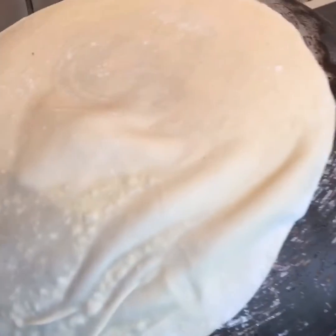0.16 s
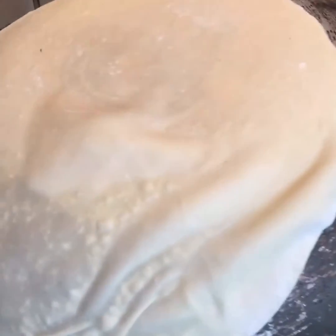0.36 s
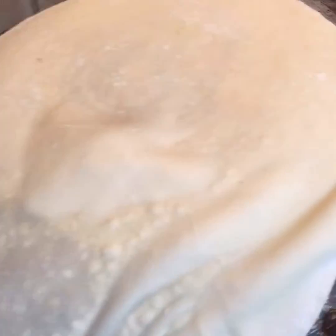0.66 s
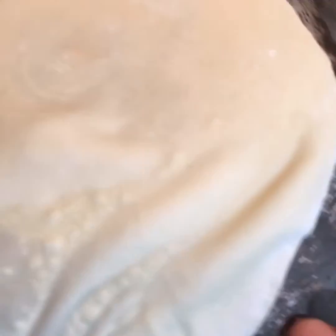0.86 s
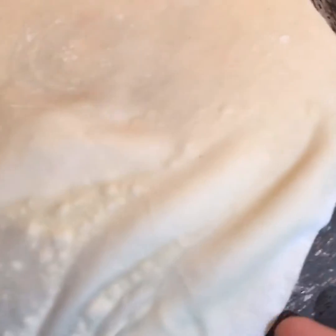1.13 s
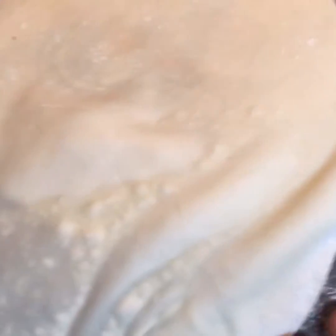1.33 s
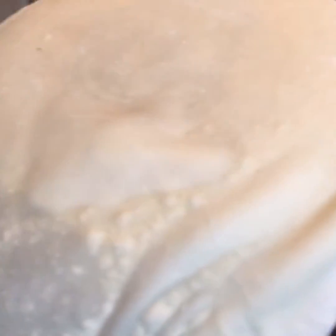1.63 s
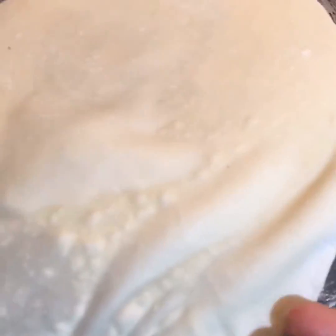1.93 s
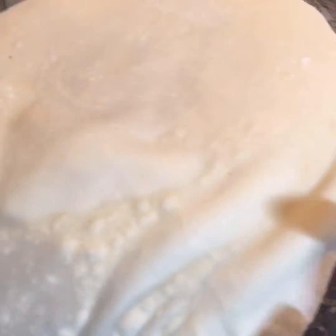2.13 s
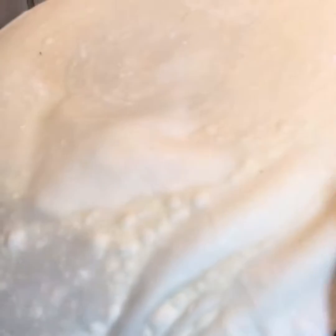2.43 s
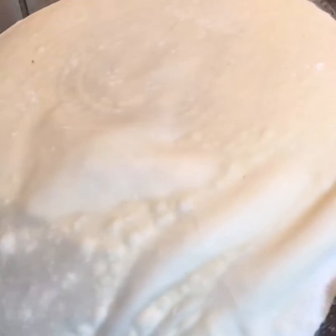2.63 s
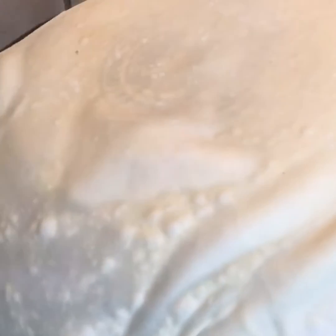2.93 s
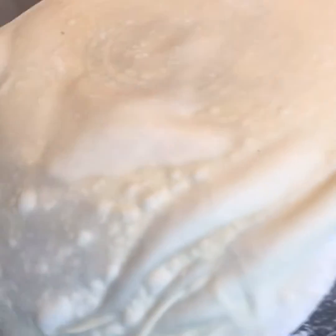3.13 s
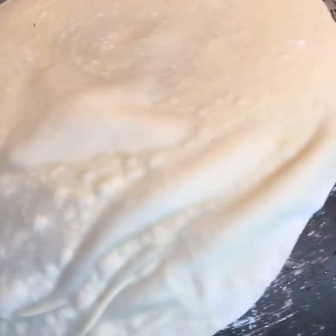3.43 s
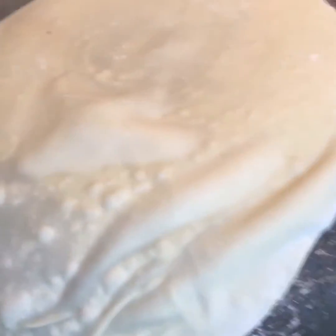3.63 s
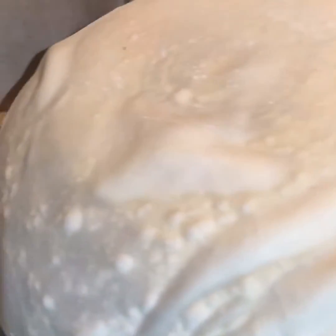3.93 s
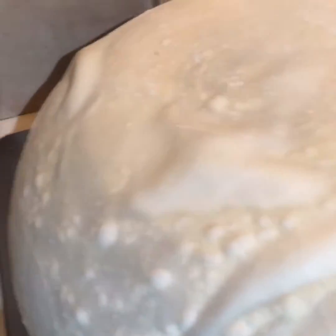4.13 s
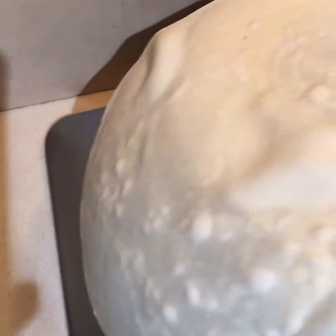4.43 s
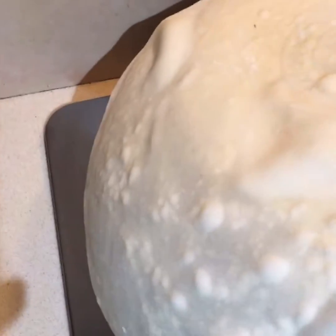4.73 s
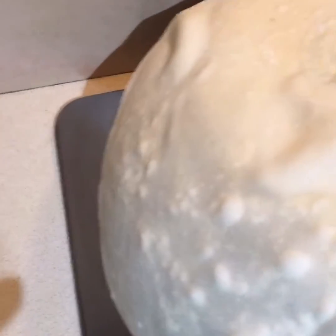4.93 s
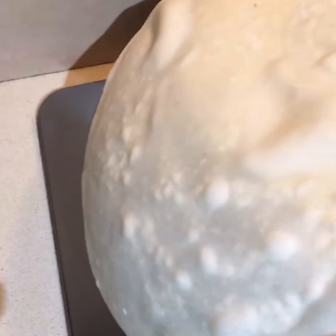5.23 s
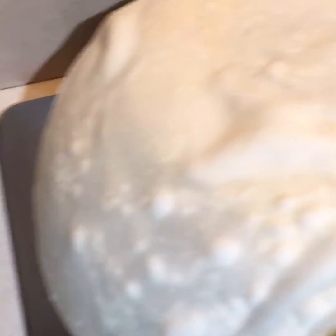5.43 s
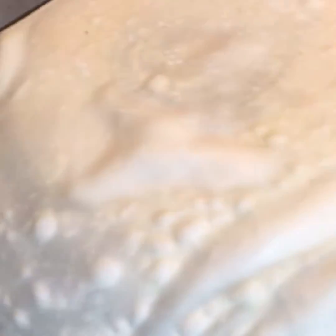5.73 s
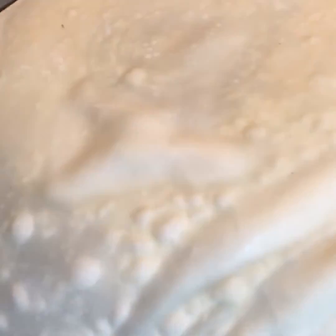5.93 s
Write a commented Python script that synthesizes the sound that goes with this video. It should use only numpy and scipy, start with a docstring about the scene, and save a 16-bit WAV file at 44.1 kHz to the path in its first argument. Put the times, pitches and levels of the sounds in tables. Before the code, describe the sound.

A gas flame burns with a low rumble and a steady hiss under a pan of flatbread, heard from close by in a kitchen. Right at the start come a light tap and the sharp, bouncing clatter of a wooden tool on the worktop. After that, small pops tick irregularly from the dough over a faint sizzle, and the burner grows a little softer as the microphone turns away.

```python
"""A light tap on a worktop over a burner's rumble and hiss, then a wooden tool set down and dropped
with a bounce. Hard-walled kitchen, phone microphone close to a flatbread on an upturned pan.
The turbulent flame rumbles, the gas jet hisses through the burner tube, and blisters in the dough
tick as they burst; one squeaks. Past halfway the microphone turns away and the burner softens."""
import sys
import numpy as np
from scipy import signal
from scipy.fft import rfft, irfft
from scipy.io import wavfile
from scipy.ndimage import uniform_filter1d

SR = 44100
rng = np.random.default_rng(int(sys.argv[2]) if len(sys.argv) > 2 else 0)


def to_wav(sig):
    """Store sig (one row per channel, or 1-D mono) as 16-bit WAV at the path in sys.argv[1].

    Samples outside -1..1 are clipped; the rate is SR.
    """
    pcm = np.clip(np.atleast_2d(sig), -1, 1) * 32767
    pcm = np.round(pcm).astype(np.int16)
    wavfile.write(sys.argv[1], SR, pcm.T)  # frames by channels


N = 267985
T = np.arange(N) / SR


def undb(db):
    return 10 ** (np.asarray(db) / 20)


def level(x, db):
    """Scale to an rms level."""
    return x * undb(db) / np.sqrt(np.mean(x ** 2))


def curve(rows):
    """Gain gliding through (t/s, level/dB) points."""
    return undb(np.interp(T, *np.transpose(rows)))


def mic_turn(facing_db, away_db, start_s=3.55, length_s=0.28):
    """Gain of a layer as the microphone turns away from the burner."""
    return curve([(start_s, facing_db), (start_s + length_s, away_db)])


def band(x, hz, width_hz):
    """Two-pole resonance, gain 1 at the centre."""
    return signal.lfilter(*signal.iirpeak(hz, hz / width_hz, fs=SR), x)


def flicker(depth_db, rate_hz):
    """Smoothly wandering gain with a spread of depth_db."""
    hold = int(SR / rate_hz)
    steps = np.repeat(rng.standard_normal(N // hold + 1), hold)
    drift = uniform_filter1d(uniform_filter1d(steps, hold), hold)[:N]
    return undb(depth_db * drift / drift.std())


def coloured(spectrum):
    """Steady noise with the given spectrum, rms 1."""
    hz, db = np.transpose(spectrum)
    bins_hz = np.maximum(np.arange(N // 2 + 1) * SR / N, 1)
    gain = undb(np.interp(np.log(bins_hz), np.log(hz), db))
    return level(irfft(rfft(rng.standard_normal(N)) * gain, N), 0)


def resonant(modes, flicker_db, rate_hz):
    """Noise singing in each resonance, every one wavering alone."""
    out = 0
    for hz, width, db in modes:
        tone = band(band(rng.standard_normal(N), hz, width), hz, 2 * width)
        out += level(tone, db) * flicker(flicker_db, rate_hz)
    return out


# The flame's roar at close range: f/Hz, relative level/dB
ROAR_SPECTRUM = [(88, -39), (150, -4), (204, 1), (261, -12), (504, -9.5), (1030, -19.5), (1230, -15.5),
                 (1580, -31), (2500, -30), (3250, -100), (5500, -120)]
# Air resonances of the kitchen and under the pan: f/Hz, width/Hz, relative level/dB
KITCHEN_MODES = [(45.6, 24, -6), (74.8, 17, -1), (115.6, 24, -1), (119.6, 30, -9), (187, 14.2, -3),
                 (210.5, 7.6, -3), (235.5, 18, -21.5)]
PAN_MODES = [(291, 54, 0), (489, 88, -3), (709, 134, -6), (1188.3, 39, -4), (1267, 82, -2.5)]
# Rumble at the microphone: t/s, level/dB
RUMBLE_LEVELS = [(1.0, -47.5), (1.13, -48.5), (2.67, -48), (2.8, -50.5), (3.69, -47), (3.87, -50.5),
                 (5.31, -51), (5.6, -55), (6.08, -49.5)]

def flame():
    """Turbulent burning drives a rumble in the kitchen air and a fluttering roar under the pan."""
    roar = coloured(ROAR_SPECTRUM) * flicker(depth_db=1, rate_hz=9)
    roar += undb(-5.5) * resonant(PAN_MODES, flicker_db=2.8, rate_hz=5.99)
    rumble = resonant(KITCHEN_MODES, flicker_db=0.85, rate_hz=3.99)
    return level(rumble, 0) * curve(RUMBLE_LEVELS) + level(roar, 3.66) * mic_turn(-57, -59.5)


# The jet's hiss at close range: f/Hz, relative level/dB
HISS_SPECTRUM = [(880, -18), (1500, -3), (2480, -8.5), (3140, -0.5), (4050, -7.5), (5610, -9.5),
                 (7600, -10.5), (9000, -7.5), (12300, -14), (13500, -12), (15800, -14.5)]
# Burner tube resonances: f/Hz, width/Hz, relative level/dB
TUBE_MODES = [(3116, 150, -9), (4740, 400, -6.5), (8267, 150, -3), (9770, 280, -10), (11620, 280, -5),
              (11850, 56, -8.5)]
WHISTLE_MODE = [(6475, 84, 1.5)]
HIGH_WHISTLE_MODES = [(10570, 150, -3.5), (11270, 170, -6.5), (15300, 340, -12)]
# Gain on the narrow whistle: t/s, level/dB
WHISTLE_LEVELS = [(1.0, -77.5), (2.3, -76.5), (2.85, -74.5), (3.6, -75), (3.9, -80.5), (4.3, -76.5),
                  (5.2, -84), (6.08, -82)]

def gas_jet():
    """Gas hisses through the burner tube, whose whistles come and go with the microphone's place."""
    hiss = coloured(HISS_SPECTRUM) * flicker(depth_db=1, rate_hz=20)
    hiss += undb(-2.5) * resonant(TUBE_MODES, flicker_db=2.1, rate_hz=7)
    whistle = resonant(WHISTLE_MODE, flicker_db=0.61, rate_hz=6) * curve(WHISTLE_LEVELS)
    high_whistles = resonant(HIGH_WHISTLE_MODES, flicker_db=1.4, rate_hz=4.86) * mic_turn(-68.5, -86)
    return level(hiss, 0) * mic_turn(-62.5, -64.5) + whistle + high_whistles


# The three bands of a blister's pop: f/Hz, width/Hz
POP_BANDS = [(2400, 4600), (6800, 8900), (13000, 10300)]
POP_SAMPLES = 600

def pop(bands_db, fizz_db=-19, fizz_ms=2.2):
    """One burst of steam: the skin snaps, then a short fizz."""
    puff = undb(fizz_db) * rng.standard_normal(POP_SAMPLES) * np.exp(-T[:POP_SAMPLES] * 1000 / fizz_ms)
    puff[0] = 1  # the snap
    parts = [band(band(puff, hz, width), hz, width) for hz, width in POP_BANDS]
    return sum(undb(db) * part / np.abs(part).max() for db, part in zip(bands_db, parts))


# Blisters bursting near the microphone: t/s, level/dB before band weighting, size/mm
BURSTS = [(0.6497, -35, 1.1), (1.3364, -36, 1.4), (1.342, -35, 1), (1.4145, -31.5, 2), (1.7694, -45, 2.2),
          (2.2193, -35, 0.85), (2.35, -40, 1.9), (3.5915, -30, 1.9), (3.718, -42, 1.9), (3.92, -41, 1.8),
          (4.1706, -30, 1.2), (4.2743, -40, 5.3), (4.534, -39, 3.7), (4.856, -43, 5), (4.8695, -30.5, 0.92),
          (4.9083, -43, 1.9), (5.255, -53, 1.8), (5.369, -34.5, 1.5), (5.4107, -41, 1.7),
          (5.557, -38.5, 4.9), (5.844, -44, 4.5), (5.9242, -41, 1.5)]

def dough(hz_at_1mm=13000, sizzle_pops=340):
    """Clear blisters, small ones bright and large ones dull, over a thin random sizzle."""
    times, levels, size_mm = np.transpose(BURSTS)
    # Pitch goes as 1 / size; a band loses 6 dB for each octave it lies from that pitch.
    octaves = np.log2(np.outer(size_mm, np.array(POP_BANDS)[:, 0]) / hz_at_1mm)
    clear = np.column_stack([times, levels, -6 * np.abs(octaves)])
    sizzle_times = rng.random(sizzle_pops) * T[-1]
    sizzle_db = -57 + 2.5 * rng.standard_normal(sizzle_pops)
    colour_db = [-5, -5, -8] + 6 * rng.standard_normal((sizzle_pops, 3))
    sizzle = np.column_stack([sizzle_times, sizzle_db, colour_db])
    out = np.zeros(N + POP_SAMPLES)
    for start_s, db, *bands_db in [*clear, *sizzle]:
        at = int(start_s * SR)
        out[at:at + POP_SAMPLES] += undb(db) * pop(bands_db)
    return out[:N]


def steam_squeak(start_s=4.543, hz=6290, t60=0.022):
    """Steam escaping from one blister gives a short narrow ring."""
    t = np.maximum(T - start_s, 0)
    envelope = 1000. ** (-t / t60) * (1 - np.exp(-t / 0.00089))
    return undb(-47) * np.sin(2 * np.pi * hz * t) * envelope


# Dense small modes too short to ring: f/Hz, relative level/dB
CRACK_SPECTRUM = [(200, -14), (500, 2), (1000, 0.5), (2200, 0), (3000, -7.5), (4100, -8), (4600, -9.5),
                  (6900, -5.5), (7500, -12.5), (8300, -7.5), (9500, -27), (11800, -14), (16000, -31)]

def strike(blows, modes_hz, rings, swell_cycles=0.63, crack_ms=8, tick_ms=1.8):
    """Each blow is a half-sine push on the modes, plus a short crack; a longer contact is duller."""
    t, out = T[:SR], np.zeros(N + 2 * SR)
    crack_noise = coloured(CRACK_SPECTRUM)
    crack_decay = 1.04 * np.exp(-t * 1000 / crack_ms) + np.exp(-t * 1000 / tick_ms)
    for start_s, body_db, contact_ms, crack_db in blows:
        at, body = int(start_s * SR), 0
        for hz, (mode_db, t60) in zip(modes_hz, rings):
            gain, detune = undb(mode_db + rng.normal()), rng.normal(1, 0.003)
            swell = 1 - np.exp(-t * hz / swell_cycles)  # slow bending waves: low modes swell late
            body += gain * np.sin(2 * np.pi * hz * detune * t) * 1000. ** (-t / t60) * swell
        response = undb(body_db) * body + undb(crack_db) * crack_noise[at:at + SR] * crack_decay
        contact_samples = contact_ms * SR / 1000
        push = np.sin(np.pi * np.arange(0.5, contact_samples) / contact_samples)
        out[at:at + SR] += np.convolve(response, push / push.sum())[:SR]
    return out[:N]


# Blows on the worktop: t/s, body gain/dB, contact/ms, crack gain/dB
TAP_BLOWS = [(.0452, -16.5, 0.13, -34)]
TOOL_BLOWS = [(.3268, -20.5, 0.81, -25), (.4388, -11.5, 0.038, -17), (.4475, -21, 0.43, -18),
              (.4765, -14.5, 0.083, -23.5), (.499, -21.5, 0.17, -31), (.519, -29, 0.34, -53)]
# The modes they excite: f/Hz
TAP_MODES = [131, 201, 579, 621, 714, 820, 1330, 1570, 1990, 2350, 3050]
TOOL_MODES = [81, 132, 212, 357, 431, 532, 592, 696, 779, 1290, 1625, 1830, 2190, 2270, 3350]
# Ring of each mode: relative level/dB, t60/s
TAP_RINGS = [(-5.5, 0.17), (0, 0.11), (1, 0.041), (-4, 0.086), (0.5, 0.036), (-19, 0.28), (-12.5, 0.036),
             (-18, 0.039), (-1, 0.011), (-7.5, 0.028), (-9.5, 0.018)]
TOOL_RINGS = [(-18, 0.69), (-7, 0.16), (-1, 0.082), (-14.5, 0.15), (-13, 0.085), (7.5, 0.034), (-0.5, 0.09),
              (3.5, 0.063), (-9, 0.046), (-35, 0.0075), (-7.5, 0.03), (-15, 0.057), (-7, 0.036),
              (-12.5, 0.045), (-9, 0.016)]

def worktop():
    """Something light taps the worktop, then a wooden tool is set down, drops and bounces."""
    return strike(TAP_BLOWS, TAP_MODES, TAP_RINGS) + strike(TOOL_BLOWS, TOOL_MODES, TOOL_RINGS)


# Decay of the kitchen's echoes: f/Hz, t60/s
KITCHEN_DECAY = [(125, 1), (500, 0.48), (800, 0.96), (2000, 0.96), (4000, 0.65), (7000, 0.27),
                 (14000, 0.42)]

def kitchen(direct, echo_db=-9.5):
    """Direct sound plus dense echoes off tiled walls, dying faster in the treble."""
    t, tail = T[:SR], 0
    hz, t60 = np.transpose(KITCHEN_DECAY)
    for centre in 63 * 2 ** np.arange(0, 8.1, 1 / 3):  # third octaves
        band_t60 = np.interp(np.log(centre), np.log(hz), t60)
        tail += band(rng.standard_normal(SR), centre, centre / 3) * 1000. ** (-t / band_t60)
    tail *= 1 - np.exp(-t / 0.0009)  # echoes build over the first moments
    tail /= np.sqrt(np.sum(tail ** 2))
    return direct + undb(echo_db) * signal.fftconvolve(direct, tail)[:N]


def scene():
    """Mono, close to the pan: burner and dough heard direct, the knocks with the kitchen's echo."""
    burner = flame() + gas_jet()
    knocks = worktop()
    return (burner + dough() + steam_squeak() + kitchen(knocks))[None]


def record(dry, low_cut_hz=38.7, high_cut_hz=15700):
    """The phone thins the deep bass and cuts the top."""
    thin = signal.sosfilt(signal.butter(2, low_cut_hz, "high", fs=SR, output="sos"), dry)
    return signal.sosfilt(signal.ellip(10, 0.2, 75, high_cut_hz, fs=SR, output="sos"), thin)


dry = scene()
out = record(dry)
to_wav(out)
```